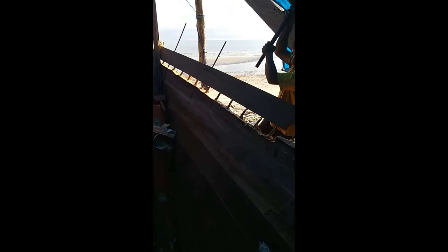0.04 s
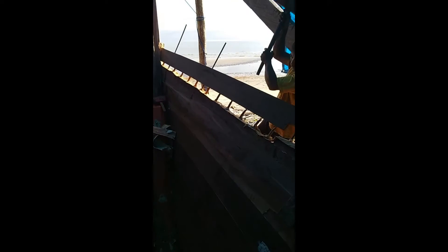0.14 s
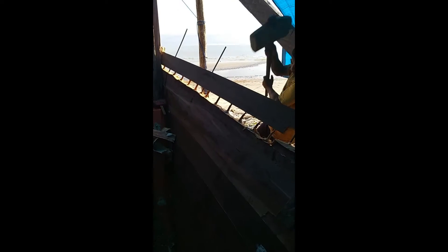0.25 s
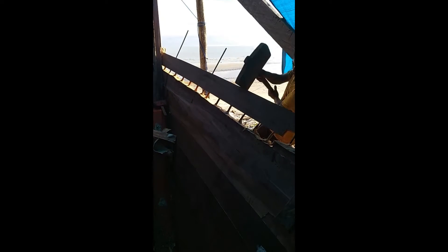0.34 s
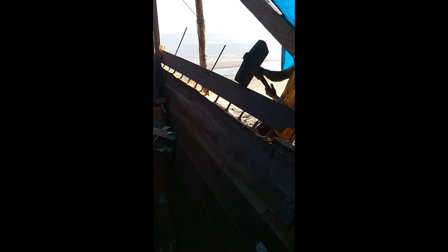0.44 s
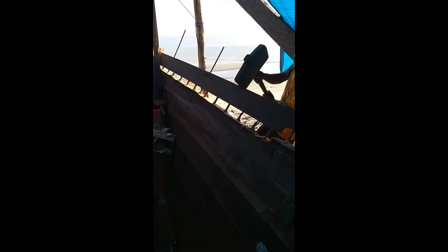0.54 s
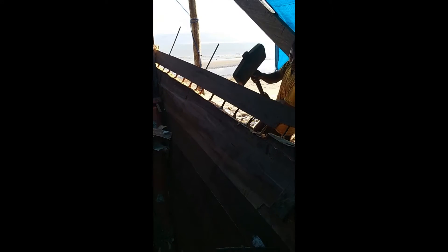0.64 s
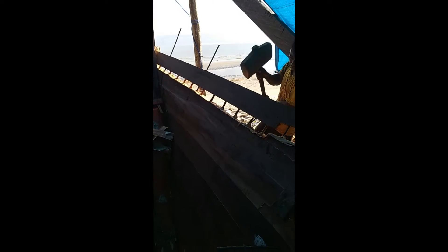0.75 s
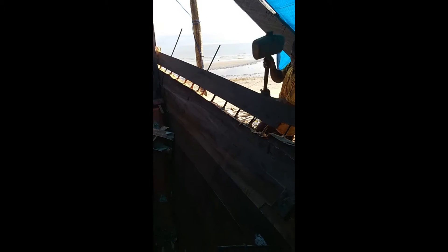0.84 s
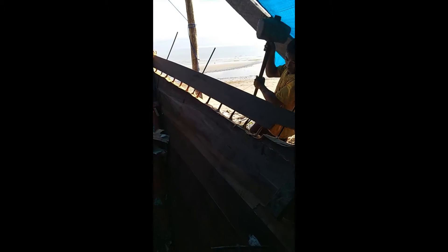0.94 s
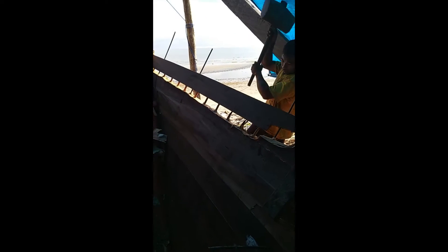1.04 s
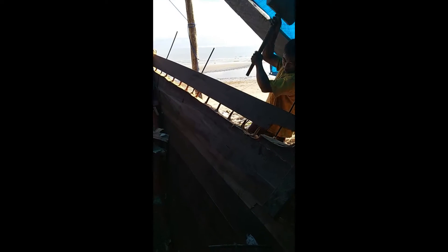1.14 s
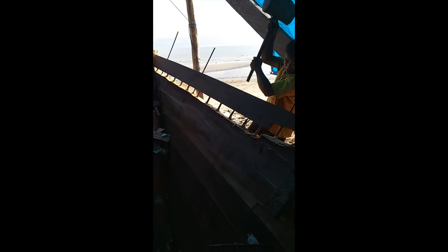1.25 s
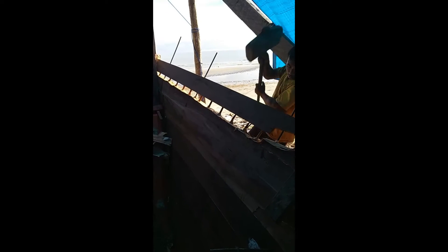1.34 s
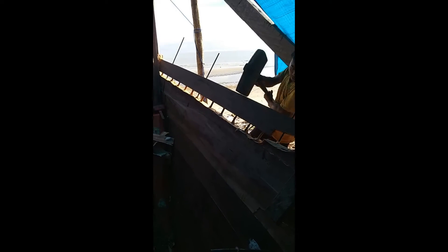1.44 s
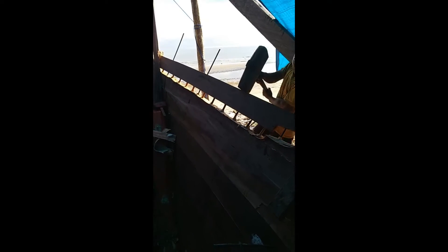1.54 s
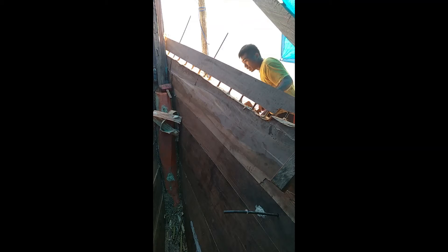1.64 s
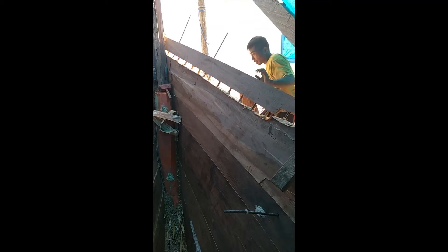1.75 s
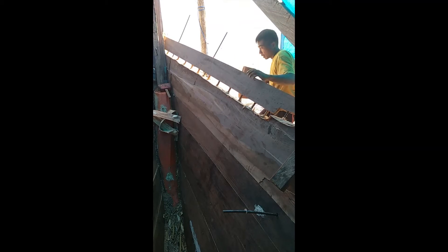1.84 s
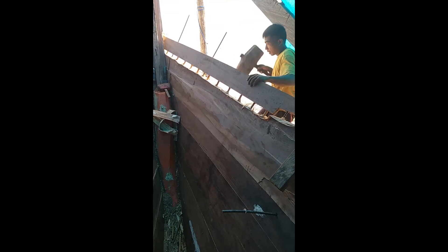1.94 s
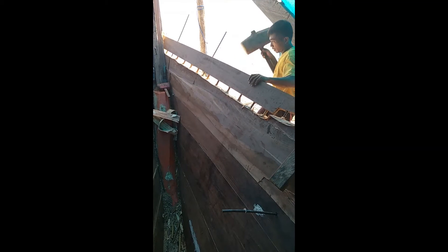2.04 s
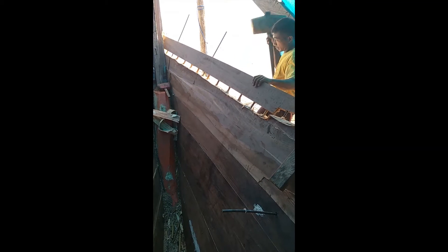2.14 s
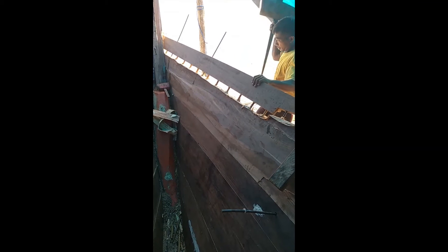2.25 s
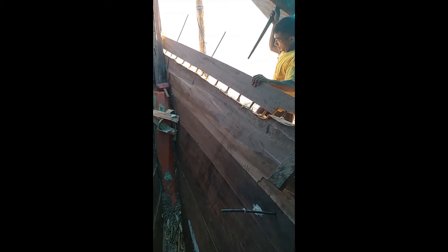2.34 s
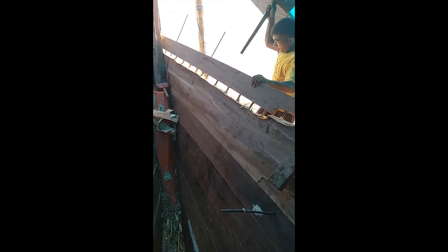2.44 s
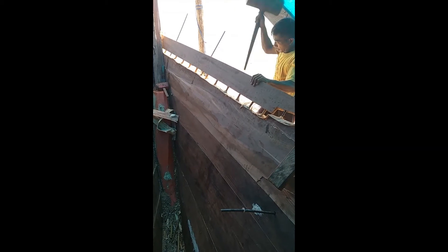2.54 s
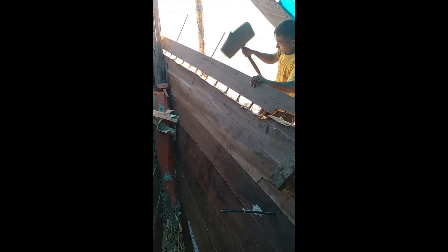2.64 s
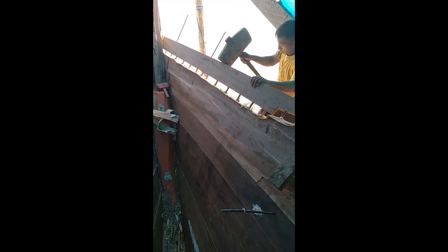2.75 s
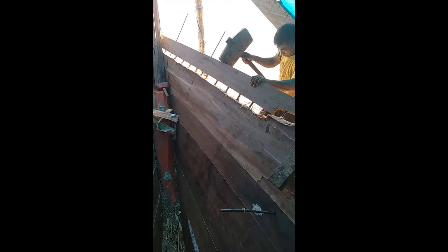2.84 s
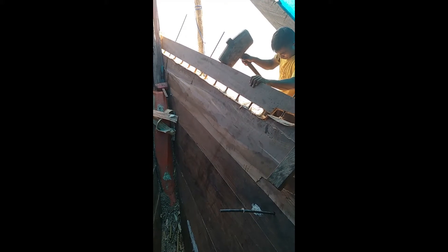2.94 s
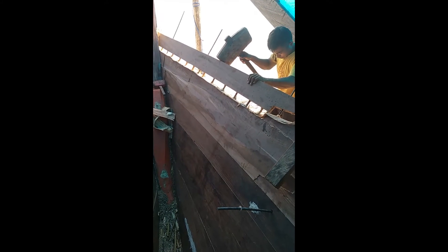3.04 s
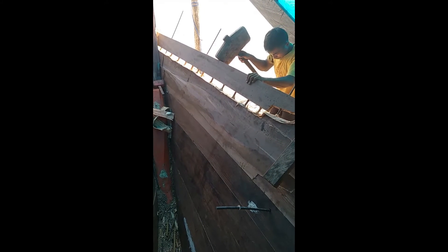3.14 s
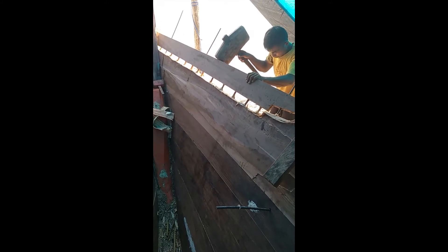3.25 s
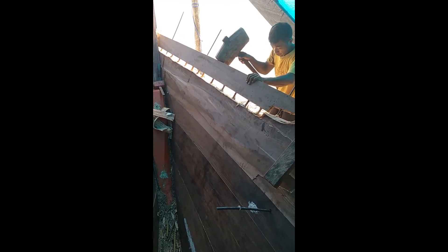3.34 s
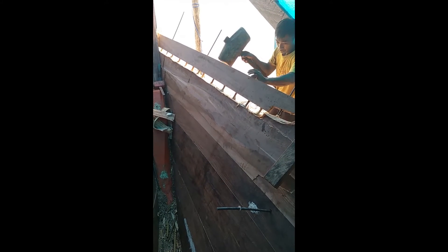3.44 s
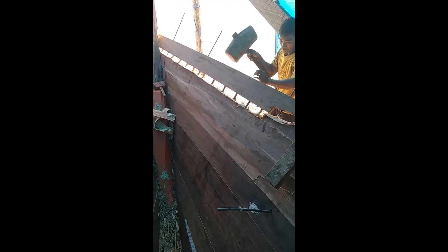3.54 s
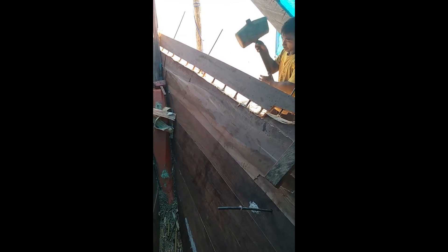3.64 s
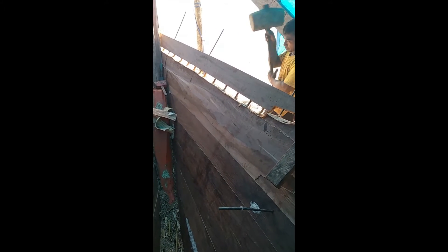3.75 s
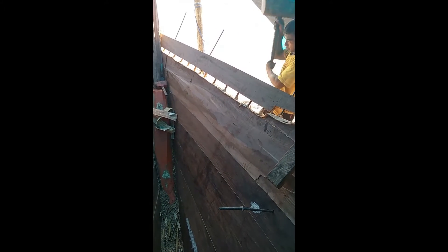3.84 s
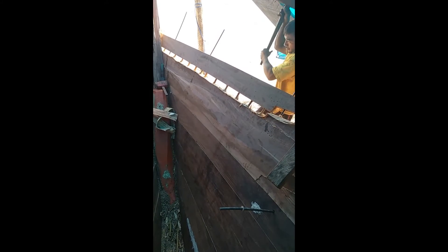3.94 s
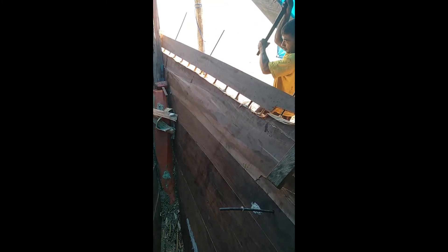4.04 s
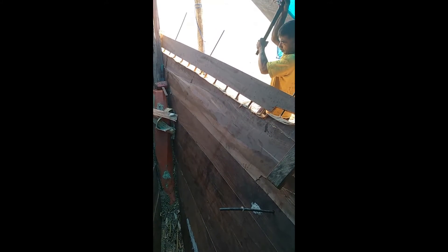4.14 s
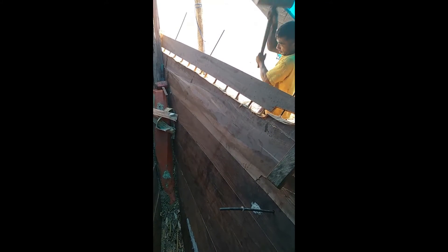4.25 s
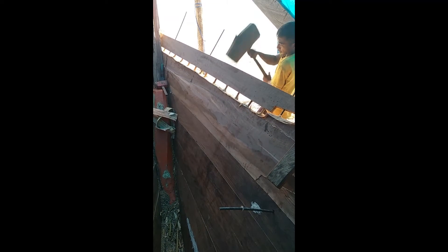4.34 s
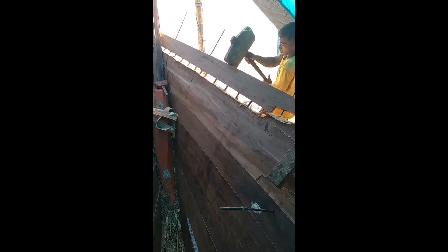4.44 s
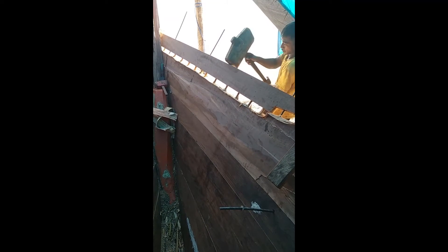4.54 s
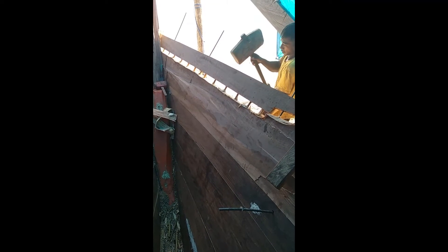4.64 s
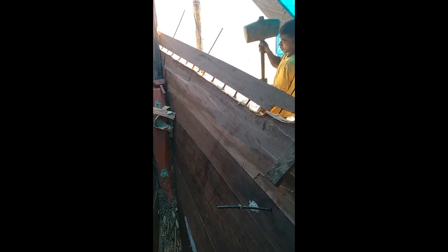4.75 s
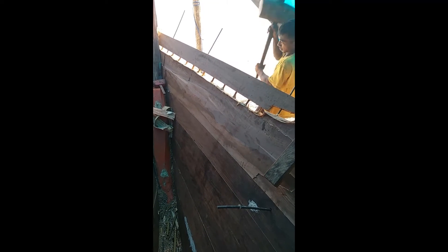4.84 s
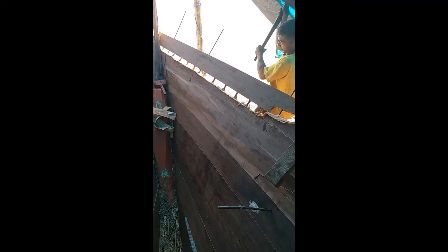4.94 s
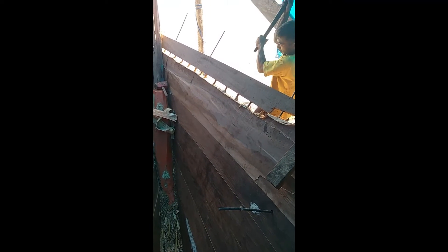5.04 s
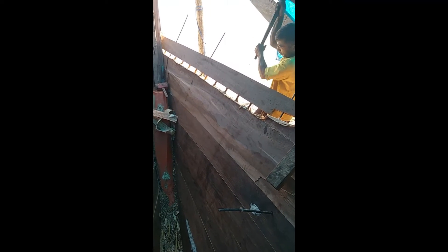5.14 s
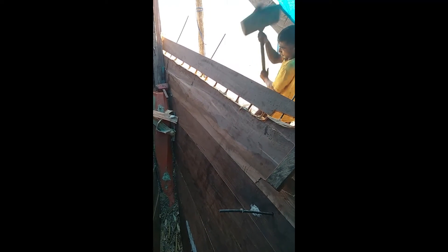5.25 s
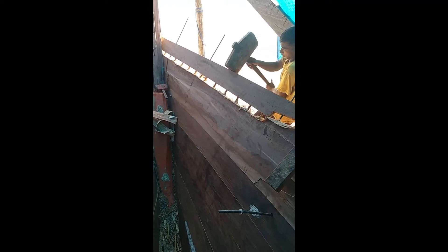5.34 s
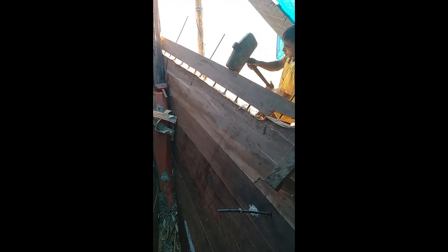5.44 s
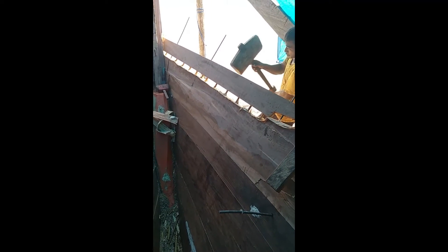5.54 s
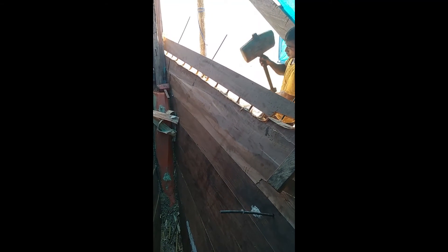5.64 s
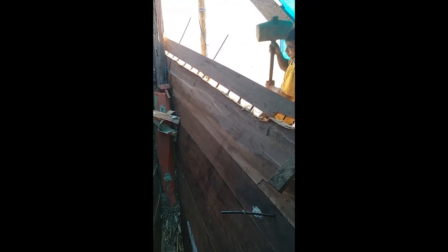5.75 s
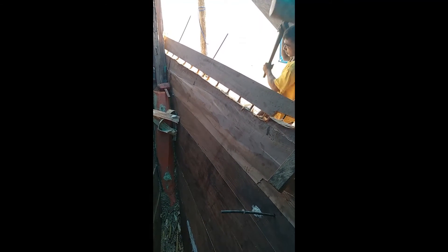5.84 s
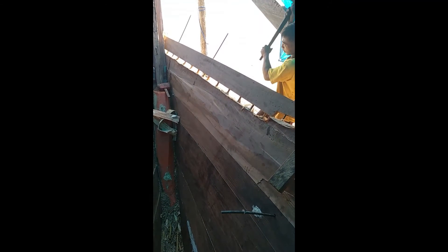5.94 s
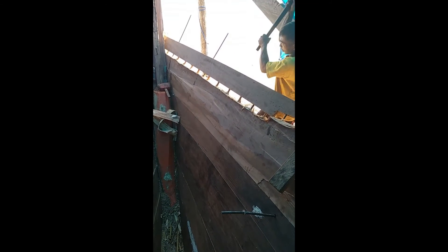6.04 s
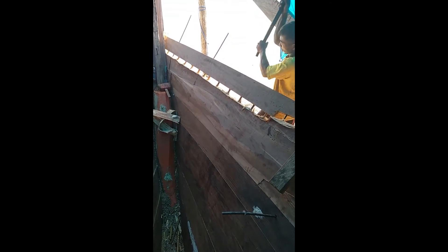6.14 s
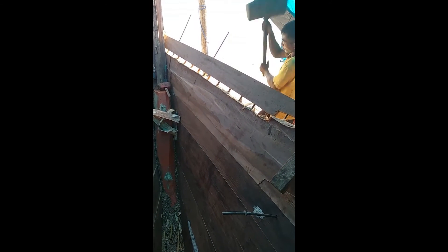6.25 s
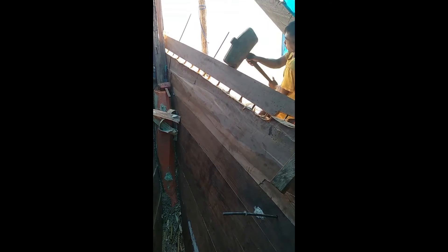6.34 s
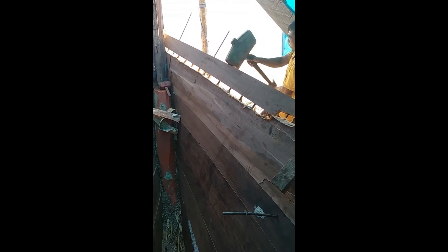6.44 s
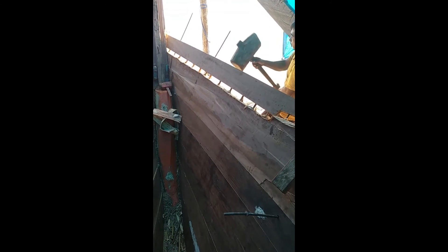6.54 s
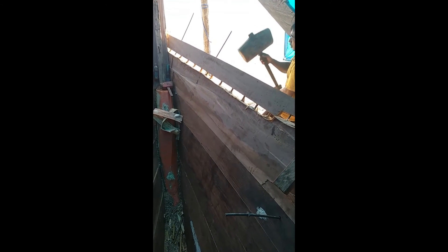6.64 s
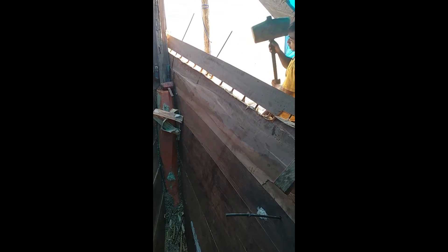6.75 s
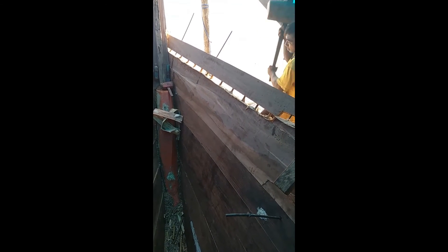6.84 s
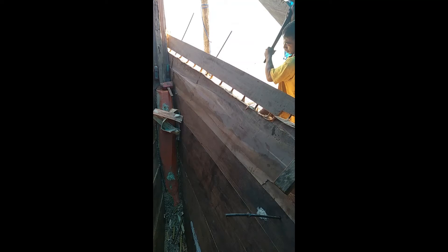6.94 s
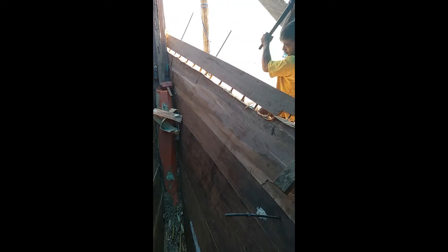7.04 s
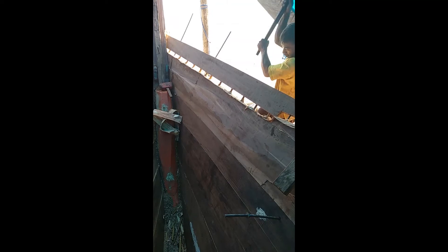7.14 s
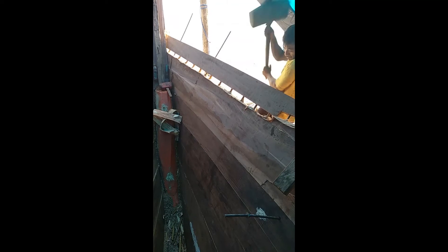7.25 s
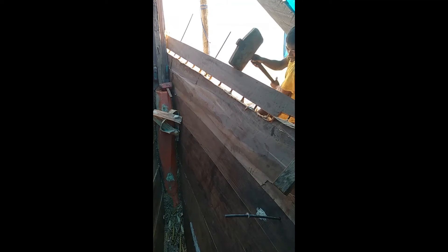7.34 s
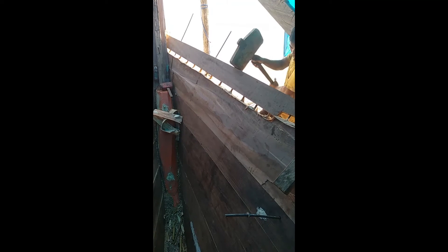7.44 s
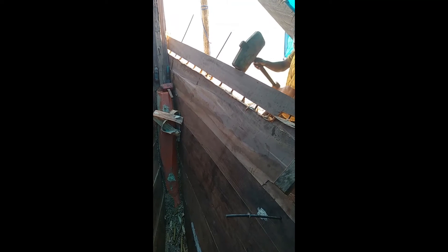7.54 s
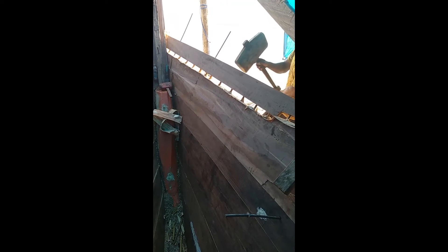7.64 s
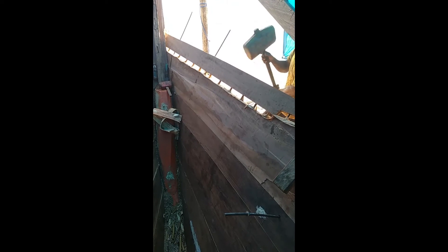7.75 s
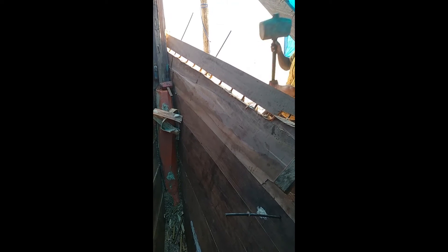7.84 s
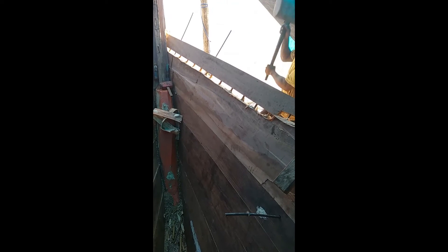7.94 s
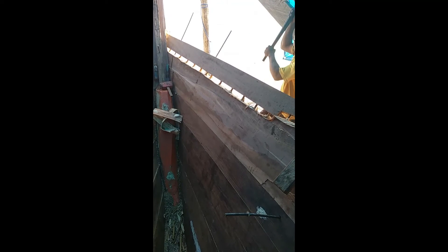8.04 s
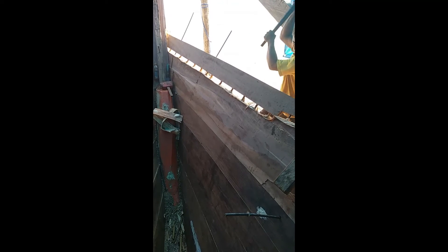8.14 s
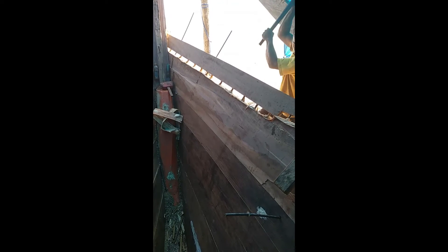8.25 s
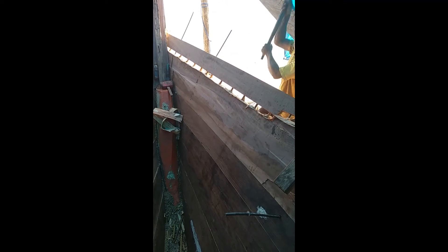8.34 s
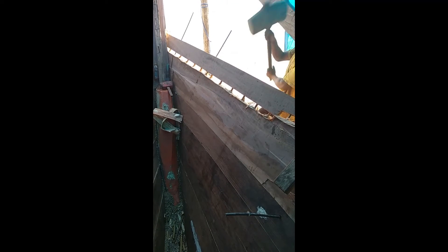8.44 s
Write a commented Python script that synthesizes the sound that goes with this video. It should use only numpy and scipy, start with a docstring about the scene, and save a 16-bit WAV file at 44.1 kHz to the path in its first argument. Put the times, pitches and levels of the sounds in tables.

```python
"""The wash of the shore and a rustle come first, then a heavy mallet drives planking on a wooden hull.
Blows follow about once a second in an open boat shed: noise cracks, decaying sines ring the plank,
and noise shaped by hollow modes booms on while the gain control recovers.
Noise knocks, rustling, thin gliding squeaks and a steel fitting that jingles (ticks with ringing sines)
fill the gaps; the hiss drops out now and then, and one edit dips the sound."""
import sys
import numpy as np
from scipy import signal
from scipy.io import wavfile
from scipy.ndimage import uniform_filter1d

SR = 44100
rng = np.random.default_rng(int(sys.argv[2]) if len(sys.argv) > 2 else 0)


def store_pcm(level_fs):
    """Save levels as 16-bit WAV."""
    pcm = np.round(np.clip(level_fs, -1, 1) * 32767).astype(np.int16)
    wavfile.write(sys.argv[1], SR, np.atleast_2d(pcm).T)


def decibels_to_gain(level_db):
    """Convert a level in decibels to a linear amplitude gain (20 dB per decade)."""
    exponent = np.asarray(level_db, float) / 20
    return 10 ** exponent


N = 375291
CUT_S = 1.7  # time of the edit

# ringing modes of the planks, before each strike varies them: pitch_hz, level_db, t60_s (time to fall 60 dB)
PLANK_MODES = [(213.5, -13.5, 0.12), (431, -14.5, 0.042), (556, -15, 0.089), (713, -6, 0.076),
               (785, 0, 0.084), (850, -9, 0.2), (975, 3.5, 0.083), (1117, -2.5, 0.045), (1225, -5, 0.16),
               (1280, -3.5, 0.081), (1390, -1.5, 0.03), (1517, -17, 0.41), (1565, 2, 0.077),
               (1820, -43, 0.073), (2000, -9.5, 0.042), (2175, -10, 0.088), (2463, -14, 0.093),
               (2890, -16, 0.15), (3570, -30, 0.021)]


def read(points, hz):
    """Reads a table over frequency, on a log axis."""
    f, value = np.transpose(points)
    return np.interp(np.log(hz + 1), np.log(f + 1), value)


def add(mix, s, sound):
    """Mixes a sound in at time s."""
    part = mix[round(s * SR):][:len(sound)]
    part += sound[:len(part)]


def lumps(frames, bins, long, wide):
    """Random patches over (Hz, time), spread 1, smoothed over long frames and wide bins."""
    x = rng.standard_normal((frames, bins))
    x = uniform_filter1d(x, long, 0)
    x = uniform_filter1d(x, wide, 1).T
    return x / x.std()


def noise(length, field_db, size):
    """Random short-time spectra under a level field in dB over (Hz, s); rms about 0.5 where it starts."""
    hop = size // 4
    hz = np.fft.rfftfreq(size, 1 / SR)[:, None]
    frames = length // hop + 5
    level = decibels_to_gain(field_db(hz, np.arange(frames) * hop / SR) + np.zeros(frames))
    real, imaginary = rng.standard_normal((frames, len(hz), 2)).T
    spectra = (real + 1j * imaginary) * level
    x = signal.istft(spectra, nperseg=size, noverlap=size - hop)[1][:length]
    return x / np.sqrt(np.sum(level[:, 0] ** 2) * 8 / 3)


def ring(modes, t, spread_db, detune=0, blur_hz=0):
    """Dying sines; every strike lands elsewhere, so levels, phases and, under load, pitches differ."""
    hz, db, t60 = np.transpose(modes)[:, :, None]
    share, phase, shift = rng.random((len(hz), 3)).T[:, :, None]
    # each tone is blurred: its phase takes a random step every 16 samples
    steps = rng.standard_normal((len(hz), len(t) // 16 + 1))
    wander = np.cumsum(steps, axis=1).repeat(16, axis=1)[:, :len(t)]
    wander = wander * np.sqrt(blur_hz * 8 / (np.pi * SR))
    turns = hz * (1 + detune * (shift - .5)) * t + phase + wander
    fall = decibels_to_gain(db + spread_db * (share - .5) - 60 * t / t60)
    return (fall * np.sin(2 * np.pi * turns)).sum(0)


def shore_wash():
    """Wash of the shore: noise, lumpy in time and pitch, that swells and sinks."""
    # colour of the wash, relative: pitch_hz, level_db (per Hz)
    colour = [(15, -30.5), (25, -6), (117, -14), (149, -3), (180, -5.5), (677, -8.5), (1400, -7.5),
              (1890, -14), (2160, -11.5), (3340, -22.5), (7710, -27.5), (11300, -24), (14000, -29),
              (16000, -24.5)]
    # its rise and fall: time_s, level_db
    swell = [(0, -40.5), (.22, -41), (.38, -38.5), (.7, -37), (.85, -42), (1.4, -42), (1.69, -44),
             (1.74, -46.5), (3.8, -45.5), (3.95, -41.5), (4.25, -45), (4.75, -40.5), (4.99, -45.5),
             (5.06, -35.5), (5.35, -47.5), (5.72, -37), (6.4, -40), (6.95, -41.5), (7.1, -39), (7.8, -39),
             (8.0, -44.5), (8.3, -36), (8.51, -49)]
    t = np.arange(N) / SR
    field_db = lambda hz, s: read(colour, hz) + 2.66 * lumps(len(s), len(hz), 8, 6)
    return noise(N, field_db, size=1024) * decibels_to_gain(np.interp(t, *np.transpose(swell)))


def rustling():
    """Rustle of tarpaulin and clothes: lumpy noise in smooth swells, each with its own brightness."""
    # colour of the rustle, relative: pitch_hz, level_db (per Hz)
    colour = [(1470, -25.5), (2500, -3.5), (2920, -2.5), (3360, -12), (5560, -6.5), (7080, -12),
              (11900, -4), (16000, -21)]
    # smooth swells: peak_s, half_length_s, level_db, brightness_db (per octave)
    swell_table = [(.0, 0.07, -36, 1), (0.126, 0.031, -42, 7), (0.365, 0.067, -33.5, -1.3),
                   (.62, 0.21, -43, 1.5), (0.775, 0.072, -46, 4.5), (0.937, 0.047, -43, 0.5),
                   (1.174, .1, -48.5, 8), (1.309, 0.047, -34, -2), (1.62, 0.068, -30.5, 3),
                   (2.473, 0.083, -47, 3.5), (3.46, 0.12, -66, 4), (3.972, 0.089, -42.5, 4),
                   (4.163, 0.061, -45, 1.5), (4.86, 0.061, -51, -3), (5.157, 0.1, -37, 1.7),
                   (5.204, 0.052, -38.5, -7.5), (5.758, .15, -45, -8), (6.0, 0.11, -42.5, 2.1),
                   (6.227, .12, -39, 2.1), (6.836, 0.11, -47, -5.5), (7.102, 0.087, -38.5, -1.1),
                   (7.254, 0.16, -48, -4), (7.753, 0.14, -50, -8), (8.154, 0.13, -43.5, 2),
                   (8.293, 0.056, -42, 2)]
    t = np.arange(N) / SR
    coarse_t = t[::64]
    peak_s, half_s, db, bright_db = np.transpose(swell_table)[:, :, None]
    swells = decibels_to_gain(db) * np.exp(-((coarse_t - peak_s) / half_s) ** 2)
    level = decibels_to_gain(-56) + swells.sum(0)  # a faint rustle stays between the swells
    lean_db = (swells * bright_db).sum(0) / level  # the loudest swell weighs most in the brightness

    def field_db(hz, s):
        bright = np.interp(s, coarse_t, lean_db) * np.log2((hz + 30) / 6000)
        return read(colour, hz) + 3.2 * lumps(len(s), len(hz), 8, 20) + bright

    return noise(N, field_db, size=1024) * np.interp(t, coarse_t, level)


def squeak(length, db, top_hz):
    """A near sine that rises in pitch, crests and falls."""
    u = np.arange(0, length, 1 / SR) / length
    hz = top_hz * (1 - .05 * (2 * u - 1) ** 2)  # 5 % lower at both ends
    return decibels_to_gain(db) * np.sin(np.pi * u) ** .5 * np.sin(2 * np.pi * np.cumsum(hz) / SR)


def knock(db, hz, octaves, t60):
    """A burst of noise around one pitch; the plank modes near that pitch answer briefly."""
    t = np.arange(SR // 4) / SR
    colour_db = lambda f, s=0: -6 * (np.log2((f + 30) / hz) / octaves) ** 2
    puff = noise(len(t), colour_db, size=256) * decibels_to_gain(-60 * t / t60)
    near_modes = [(f, d + 3 * colour_db(f), decay) for f, d, decay in PLANK_MODES]
    wood = 0.36 * ring(near_modes, t, spread_db=9.0)
    rise_s = 0.003 + 0.029 * t60  # longer scuffs start more softly
    click = 2.1 * puff * np.exp(-t / 0.0011 - t60 / 0.13)  # sharp front, lost in long scuffs
    return decibels_to_gain(db) * ((puff + wood) * (1 - np.exp(-t / rise_s)) + click)


def jingle(tick_db, lower_db, upper_db, body_db):
    """A dry tick sets the steel's high pair and its lower modes ringing; their level wavers at random."""
    # colour of the tick, before its peak is added: pitch_hz, level_db (per Hz)
    tick_colour = [(500, -12), (1500, -5), (3500, -8.5), (5200, -5.5), (7500, -7), (12000, -3.5),
                   (16000, -22)]
    # lower modes of the steel, before each strike varies them: pitch_hz, level_db, t60_s
    steel_modes = [(1144, -14.5, 0.72), (1206, -16, 0.25), (1530, -9.5, 0.21), (1663, -9, 0.23),
                   (2306, -7, 0.21), (2980, -9, 0.16), (3130, -12, 0.29), (3880, -16.5, 0.25),
                   (4800, -10.5, 0.26), (5850, -30, 0.15)]
    t = np.arange(SR // 4) / SR
    tick_hz = 4560 * 2 ** (0.2 * rng.exponential())  # the peak strays upwards, in octaves

    def colour_db(hz, s):
        peak_db = 10.6 * np.exp(-(np.log2((hz + 30) / tick_hz) / 0.15) ** 2)
        return read(tick_colour, hz) + peak_db

    tick = noise(len(t), colour_db, size=256) * decibels_to_gain(tick_db - 60 * t / 0.1)
    tick = tick * (1 + 1.58 * np.exp(-t / 0.0017))  # sharp front
    pair_modes = [(9943, lower_db, 0.26), (10134, upper_db, 0.35)]  # close together: Hz, dB, t60 s
    pair = ring(pair_modes, t, spread_db=2, blur_hz=9.4)
    body = decibels_to_gain(body_db) * ring(steel_modes, t, spread_db=17.5, detune=0.0293, blur_hz=44.6)
    waver = decibels_to_gain(2.5 * np.interp(t, np.arange(40) * .008, rng.standard_normal(40)))
    return (tick + body * waver) * (1 - np.exp(-t / 0.0015)) + pair * waver * (1 - np.exp(-t / 0.0053))


def boom_field(hz, s, tilt_db, stretch):
    """The hull fills and empties band by band; the boom is randomly lumpy, and its treble flickers."""
    # colour of the hull after a blow, relative: pitch_hz, level_db (per Hz)
    colour = [(18, -49), (30, -16), (259, -10.5), (319, -3.5), (526, -2), (584, -2.5), (702, -3.5),
              (760, -2.5), (1250, -12.5), (1390, -15), (3580, -24), (10200, -18.5), (16000, -30)]
    # hollow modes standing out of the boom: pitch_hz, width_hz, level_db
    hollow_modes = [(47, 14, 5), (77.5, 11, 2), (139, 19, 3), (165, 22, 8.5), (219.3, 21, 12),
                    (273, 23, 7.5), (351, 32, 7), (422, 25, 5), (469, 22, 11.5), (579, 15, 4.5),
                    (783, 22, 5), (1013, 52, 3.5), (1243, 24, 9), (1343, 34, 6), (1466, 5, 6)]
    # time to fill, before the stretch; bass and highest treble fill late, the middle quickly: pitch_hz, rise_s
    rise = [(40, 0.14), (200, 0.085), (600, 0.07), (1500, 0.0069), (14000, 0.12)]
    # time to fall 60 dB, before the stretch: pitch_hz, t60_s
    decay = [(40, 1), (150, 0.5), (500, 0.35), (1500, 0.49), (5000, 0.4), (14000, 0.38)]
    modes_db = sum(db * np.exp(-((hz - f) / width) ** 2) for f, width, db in hollow_modes)
    fill_db = 20 * np.log10(1.001 - np.exp(-(s + 0.015) / (stretch * read(rise, hz))))
    flicker_db = 4.2 * lumps(len(s), 1, 1, 1) * (hz > 1800)
    rough_db = 3.34 * lumps(len(s), len(hz), 3, 6) + flicker_db
    # the tilt turns about the hull's hollow, near 190 Hz
    lean_db = tilt_db * np.log2(np.maximum(hz, 40000 / (hz + 30)) / 1000)
    shape_db = fill_db + rough_db - 60 * s / (stretch * read(decay, hz))
    return read(colour, hz) + modes_db + lean_db + shape_db * (s > 0)


def blow(crack_db, wood_db, tilt_db):
    """Snap, crack and plank ring, driven while the mallet presses and falling as it lifts; then the boom."""
    # colour of the splintery burst of contact, relative: pitch_hz, level_db (per Hz)
    crack_colour = [(880, -27.5), (1500, -6.5), (2640, -5.5), (3030, -15.5), (3410, -10.5), (7240, -12),
                    (9470, -7), (16000, -16)]
    t = np.arange(SR) / SR
    stretch = 0.91 - 0.012 * tilt_db  # duller blows boom longer
    pressing = 0.31 + 1 / (1 + np.exp((t - .019) / 0.0074))  # lets go at about 19 ms
    snap = 0.98 * rng.standard_normal(SR) * np.exp(-((t - .001) / 0.00014) ** 2)
    crack = noise(SR, lambda hz, s: read(crack_colour, hz), size=256)
    crack = crack * decibels_to_gain(-60 * t / 0.19) * (1 - np.exp(-t / 0.0031))
    plank = ring(PLANK_MODES, t, spread_db=9.0, detune=0.0043) * (1 - np.exp(-t / 0.0054))
    boom = noise(SR, lambda hz, s: boom_field(hz, s, tilt_db, stretch), size=2048)
    boom = boom * (1 - np.exp(-t / 0.0047))
    contact = decibels_to_gain(crack_db) * (snap + crack * pressing)
    return contact + decibels_to_gain(wood_db) * (decibels_to_gain(-0.4) * plank * pressing + boom)


def scene():
    """Places every sound; those begun before the edit stop at it, and shore and rustle run through."""
    # mallet blows, before the gain control: start_s, crack_db, wood_db, boom_tilt_db (per octave)
    blow_table = [(.395, 3.5, 7.5, -2.5), (1.495, 4, 2.5, -2.5), (2.7485, 7.5, 4.5, 0.2),
                  (4.4405, 6.5, 4.5, 0), (5.384, 9, 7.5, 0.55), (6.4035, 11.5, 7, .5), (7.39, 11, 7, .5),
                  (8.4, -11, -23, 1.5)]
    # light knocks and scuffs on wood: start_s, level_db, centre_hz, width_octaves, t60_s
    knock_table = [(.198, -32, 326, 0.65, .1), (1.076, -28.5, 11200, 1.7, .054),
                   (1.105, -38, 1230, 2.4, 0.17), (1.158, -33, 1000, 1.2, .08),
                   (1.427, -14.5, 11300, 1, 0.24), (1.43, -26, 890, 1.23, 0.44),
                   (1.716, -27, 10200, 0.087, 0.12), (1.75, -35, 456, 0.38, 0.11),
                   (2.194, -29.5, 850, 0.43, .057), (2.417, -34.5, 4000, 2.1, 0.11),
                   (2.47, -26, 11000, 0.15, 0.11), (2.718, -33, 1500, 2.1, 0.089),
                   (3.24, -30, 920, .51, 0.072), (3.243, -25.5, 5000, 1.4, 0.12),
                   (3.578, -30, 1570, 1.2, .11), (3.897, -31.5, 1630, 0.83, 0.15),
                   (3.915, -24.5, 5300, 0.18, 0.1), (4.339, -35.5, 2840, .9, 0.053),
                   (4.815, -25.5, 1710, 1.6, 0.22), (4.842, -25.5, 1570, 2.3, 0.074),
                   (4.86, -33.5, 4800, 0.22, 0.17), (5.36, -23, 6000, 2.9, .06),
                   (5.374, -19.5, 7000, 2.8, 0.094), (7.872, -29.5, 2400, 3, 0.13),
                   (7.909, -27, 990, 1.1, .095), (7.915, -31.5, 6160, 0.98, .12),
                   (8.19, -32.5, 1000, .71, 0.055), (8.24, -27.5, 5000, 2.6, .14)]
    # steel fitting jingling: start_s, tick_db, lower_ring_db, upper_ring_db, body_db
    jingle_table = [(4.815, -35, -48, -50, -35), (4.845, -29, -46, -46, -37), (5.004, -39, -47, -50, -59),
                    (5.02, -43, -57, -55, -49), (5.036, -43, -50, -53, -56), (5.054, -39, -42, -48, -55),
                    (5.114, -27, -30, -29, -56), (5.139, -24, -39, -44, -33), (5.18, -17, -31, -33, -29.5),
                    (5.22, -31, -58, -47, -29), (5.275, -43, -47, -39.5, -33.5),
                    (5.501, -12.5, -23, -33, -29), (5.523, -19.5, -36, -32, -39),
                    (5.549, -28, -41, -30, -41), (5.613, -29.5, -41, -42, -34),
                    (5.639, -25.5, -32, -31, -32), (5.665, -40, -36, -34, -51),
                    (5.777, -31.5, -33, -30, -36), (5.845, -49, -49, -41, -47),
                    (5.881, -30.5, -43, -37, -43), (5.927, -33, -36, -34, -41), (6.015, -41, -35, -31, -51),
                    (6.037, -32, -36, -31, -40), (6.12, -34, -35, -46, -47),
                    (6.164, -23.5, -48.5, -35, -36), (6.196, -34, -29.5, -38, -33.5),
                    (6.252, -25.5, -46, -43, -33), (6.293, -37.5, -27, -34, -40.5),
                    (6.36, -67, -28.5, -51, -34), (6.499, -19, -35, -15, -19.5),
                    (6.549, -21, -32, -28, -34), (6.6, -20.5, -30, -34, -36),
                    (6.648, -39, -27, -28.5, -40.5), (6.754, -37, -45, -42, -43),
                    (6.792, -36, -37, -42, -33), (6.835, -29.5, -42, -32, -37.5),
                    (6.869, -34, -25, -34, -44), (6.906, -38, -45, -57, -41), (6.999, -29, -35, -28, -46),
                    (7.015, -24.5, -39, -31, -38), (7.068, -31, -56, -60, -40), (7.093, -32, -34, -36, -41),
                    (7.159, -26, -36, -39, -36.5), (7.221, -33, -38, -29.5, -35),
                    (7.263, -36, -55, -38, -46), (7.31, -26, -21.5, -31, -34.5),
                    (7.499, -15.5, -32.5, -19, -27), (7.567, -31, -46, -32, -55),
                    (7.62, -54, -41, -33, -40), (7.709, -27, -47, -42, -40), (7.74, -38, -38, -46, -42),
                    (7.776, -30, -26.5, -38, -41)]
    # thin high squeaks: start_s, length_s, level_db, top_hz
    squeak_table = [(2.24, .115, -58, 13100), (4.695, .115, -61, 15100)]
    before, after = np.zeros((2, N))
    sources = ((blow_table, blow), (knock_table, knock), (jingle_table, jingle), (squeak_table, squeak))
    for table, source in sources:
        for s, *row in table:
            add(before if s < CUT_S else after, s, source(*row))
    work = np.where(np.arange(N) < CUT_S * SR, before, after)
    return (work + shore_wash() + rustling())[None]


def gain_control(x):
    """Clamps whatever rises above -9 dB, then gives the level back steadily, which holds up the boom."""
    power_db = 10 * np.log10(signal.lfilter([.02], [1, -.98], x[0] ** 2) + 1e-12)
    recovery_db = np.arange(N) * 97.4 / SR  # 97.4 dB regained a second
    held_peak_db = np.maximum.accumulate(power_db + recovery_db) - recovery_db
    over_db = np.maximum(held_peak_db + 9, 0)
    return x / decibels_to_gain(uniform_filter1d(over_db, 40))


def dropouts(x):
    """The hiss drops out for some milliseconds: bins that do not stand above their neighbours sink."""
    # moments of dropout; a bin loses at most two thirds of depth_db: time_s, half_length_s, depth_db, from_hz
    moments = [(2.819, 0.0078, -22, 1800), (2.877, 0.0053, -12, 2000), (3.263, 0.014, -16, 300),
               (3.74, 0.0074, -15, 1500), (3.995, 0.011, -1, 2000), (4.57, 0.0056, -1, 1400),
               (4.869, 0.0088, -9, 1500), (5.265, .016, -22, 100), (5.327, 0.0084, -17, 100),
               (5.464, 0.0074, -20, 1900), (6.268, .014, -16, 100), (6.664, 0.0098, -24, 1800),
               (6.812, 0.0068, -1, 300), (6.942, 0.012, -17, 1500), (7.187, 0.007, -6, 1500),
               (7.233, 0.0087, -10, 1500), (7.562, 0.0078, -21, 1800), (7.852, 0.011, -16, 2500)]
    hz, t, z = signal.stft(x, SR, nperseg=512, noverlap=448)
    level_db = 10 * np.log10(uniform_filter1d(abs(z) ** 2, size=9, axis=-1) + 1e-16)
    height_db = level_db - uniform_filter1d(level_db, size=25, axis=-2)
    weak = 1 / (1.5 + np.exp((height_db - 5.5) / 1.6))  # tones standing well over 5.5 dB go on
    depth_db = 0
    for s, half, db, low in moments:
        in_treble = 1 / (1 + (low / (hz[:, None] + 1)) ** 6)
        depth_db = depth_db + db * np.exp(-((t - s) / half) ** 4) * in_treble
    return signal.istft(z * decibels_to_gain(depth_db * weak), SR, nperseg=512, noverlap=448)[1][:, :N]


def edit_fade():
    """Level around the edit: a fade of 41 ms down to -40 dB, then a return in 18 ms."""
    to_cut = np.arange(N) / SR - CUT_S
    closeness = np.clip(1 - np.maximum(-to_cut / 0.041, to_cut / 0.018), 0, 1)
    return decibels_to_gain(-40 * closeness ** 1.36)


def top_cut(x):
    """Nothing passes above the cut-off."""
    return signal.sosfilt(signal.butter(12, 16990, fs=SR, output="sos"), x)


def record(dry):
    """Gain control, dropouts, bass cut, soft clipping, the fade at the edit and a band limit."""
    held = dropouts(gain_control(dry))
    held = signal.lfilter(*signal.butter(2, 35, "high", fs=SR), held)
    clipped = np.tanh(held / 0.86) * 0.9 * edit_fade()
    band_limit = signal.firwin(255, 16000, window=("kaiser", 8), fs=SR)
    mix = signal.oaconvolve(clipped, band_limit[None], "same")
    return top_cut(mix)


dry = scene()
out = record(dry)
store_pcm(out)
```